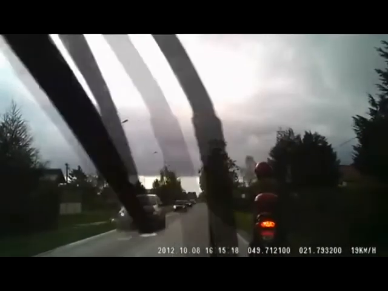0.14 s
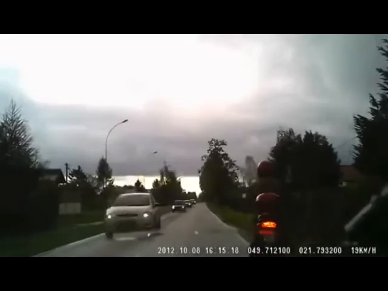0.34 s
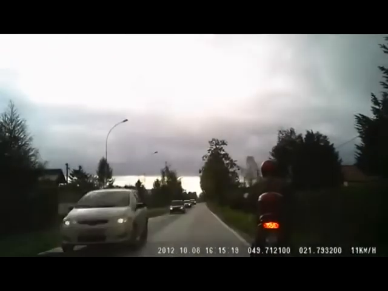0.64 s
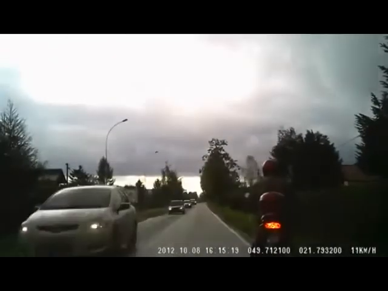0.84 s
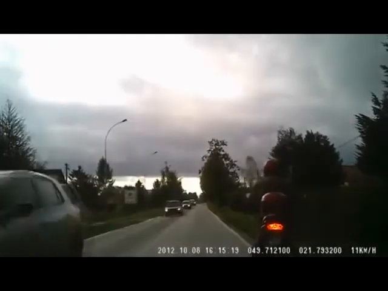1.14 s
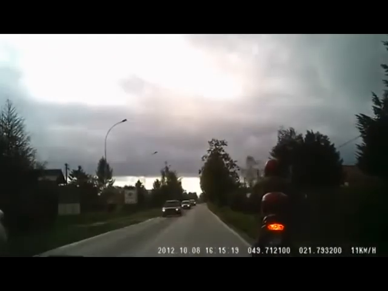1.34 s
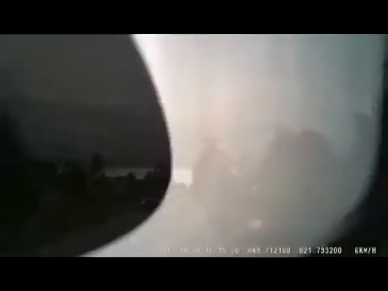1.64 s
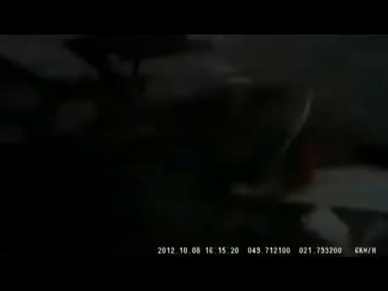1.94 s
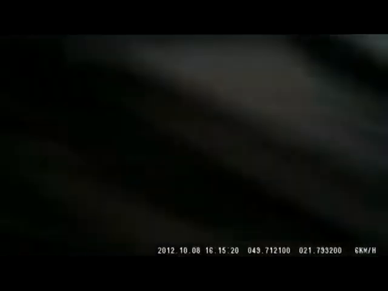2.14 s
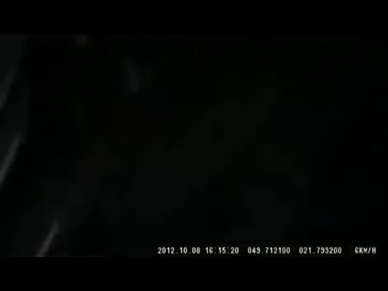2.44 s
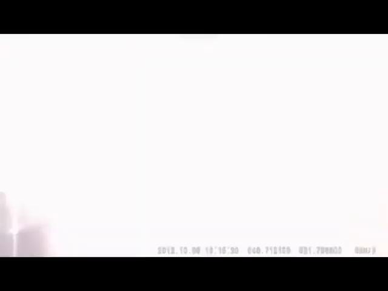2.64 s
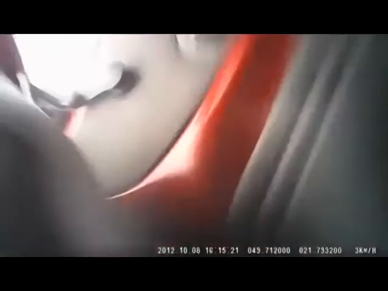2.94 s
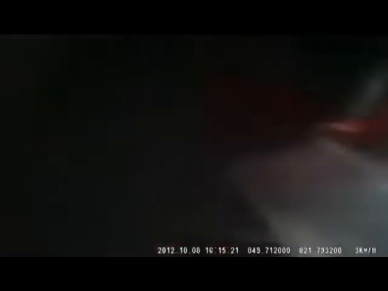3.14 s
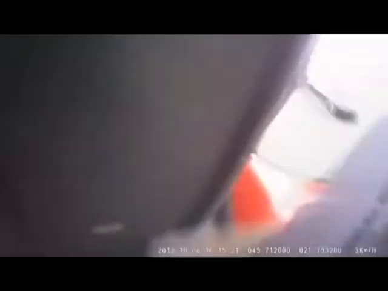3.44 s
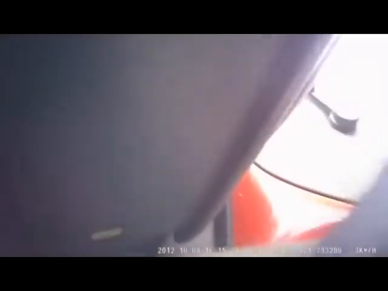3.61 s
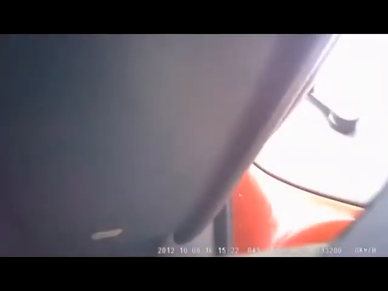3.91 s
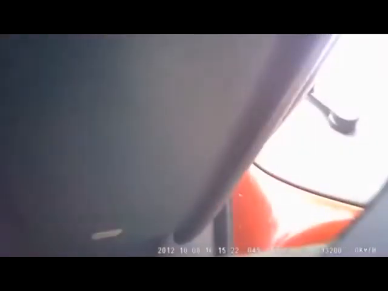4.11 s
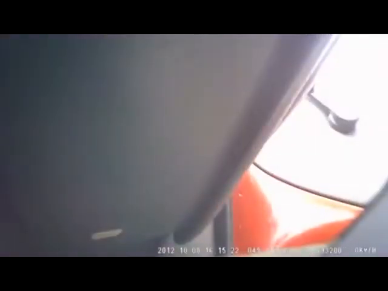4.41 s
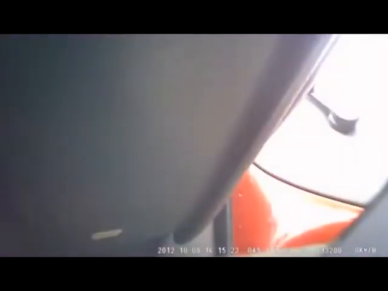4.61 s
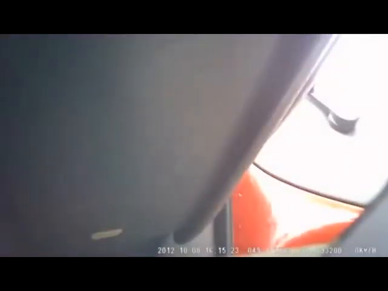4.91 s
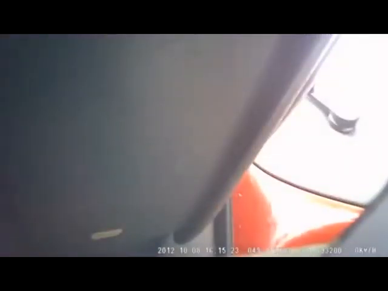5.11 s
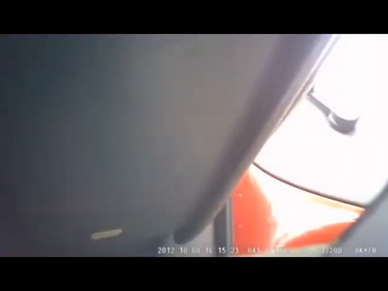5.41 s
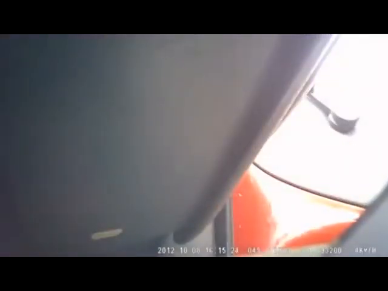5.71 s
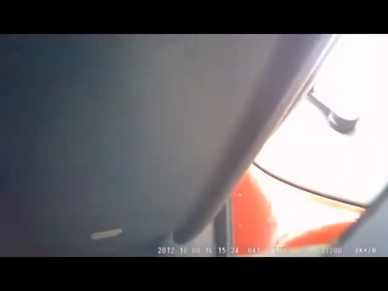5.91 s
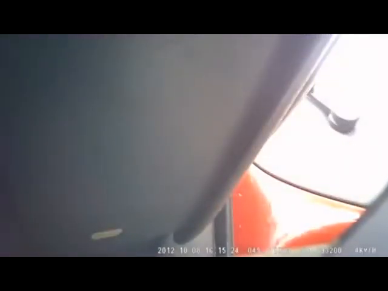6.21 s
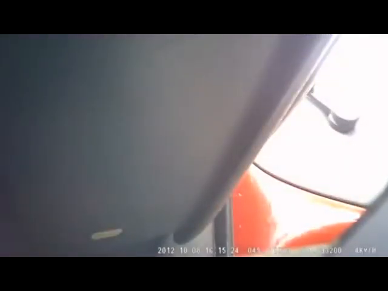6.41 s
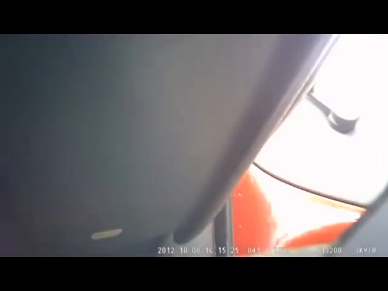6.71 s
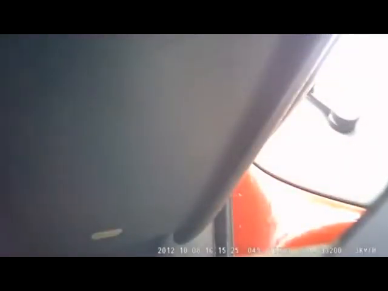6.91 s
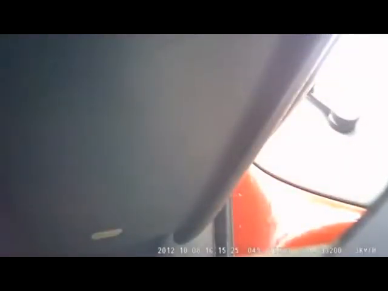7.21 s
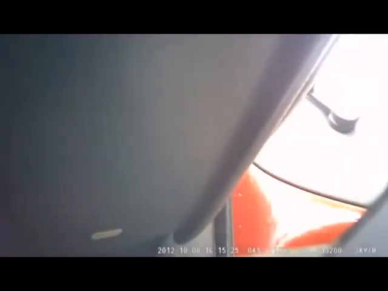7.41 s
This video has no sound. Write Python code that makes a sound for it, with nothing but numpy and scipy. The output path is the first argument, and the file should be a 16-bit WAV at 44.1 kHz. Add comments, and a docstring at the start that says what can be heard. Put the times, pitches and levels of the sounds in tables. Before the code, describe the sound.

The sound is heard inside a car through a small microphone with dull treble. Tyres rumble and hiss faintly on a wet road. The wipers drag and thump at about 0.4 seconds, and spray slaps the car at 1.1 seconds, then drains away. At 1.8 seconds a very loud collision begins: panels crumple, plastic splinters and the body jolts deeply, while rapid, irregular knocks and cracks distort the microphone as it is thrown about. A short rising plastic squeak comes near 2.9 seconds. The crunching and clattering end at about 4 seconds, followed by a brief, light rattle of bent trim. From there until the end at about 7.5 seconds, the engine idles with a quiet, throbbing hum under a faint, wavering wiper motor whine. The blades thump softly about every half second, alternately stronger and weaker, and a small dry scuff comes at 5.3 seconds.

```python
"""A car crash on a wet road, heard by a small camera in the cabin. The car rolls slowly, wipers on, and an
oncoming car throws spray at it. Then it is struck: bodywork crumples and the camera is thrown about,
its knocks overloading the microphone. Afterwards bent trim settles, the engine idles on and the
wipers keep turning."""
import sys
import numpy as np
from scipy import signal
from scipy.fft import rfft, irfft, next_fast_len
from scipy.io import wavfile
from scipy.ndimage import uniform_filter1d

SR = 44100
rng = np.random.default_rng(int(sys.argv[2]) if len(sys.argv) > 2 else 0)


def persist_wave(psi):
    """Save psi, clipped to +-1, as 16-bit WAV."""
    counts = np.round(np.clip(psi, -1, 1) * 32767).astype(np.int16)
    wavfile.write(sys.argv[1], SR, np.atleast_2d(counts).T)


N = 332955
T = np.arange(N) / SR


def undb(db):
    """Decibels to gain."""
    return 10 ** (np.asarray(db) / 20)


def unit(x):
    """Scale to rms 1."""
    return x / np.sqrt(np.mean(x ** 2))


def colour(x, spectrum):
    """Minimum-phase filter through (freq_hz, gain_db) points."""
    hz, db = np.transpose(spectrum)
    size = 2 * next_fast_len(N // 2 + 8192)
    bins_hz = np.maximum(np.arange(size // 2 + 1) * SR / size, 1)
    gain = undb(np.interp(np.log(bins_hz), np.log(hz), db))
    cepstrum = irfft(np.log(gain))
    cepstrum[1:size // 2] *= 2
    cepstrum[size // 2 + 1:] = 0
    return irfft(rfft(x, size) * np.exp(rfft(cepstrum)))[:N]


def noise(spectrum):
    """Coloured noise, rms 1."""
    return unit(colour(rng.standard_normal(N), spectrum))


def walk(rate_hz):
    """Smooth random drift, rms 1."""
    steps = rng.standard_normal(N)
    return unit(np.interp(T * rate_hz, np.arange(N), steps))


def grains(spectrum, rate_hz, spread_db):
    """Dense coloured clicks of unequal size, levelled to rms 1."""
    clicks = (rng.random(N) < rate_hz / SR) * rng.standard_normal(N)
    sizes = undb(spread_db * np.minimum(rng.exponential(size=N), 4))
    sound = colour(clicks * sizes, spectrum)
    return sound / np.sqrt(uniform_filter1d(sound ** 2, size=2048) + 1e-12)


def swell(start_s, attack_s, decay_s, hold_s=0):
    """Envelope: linear rise to 1, hold, exponential decay."""
    age_s = T - start_s
    return np.clip(age_s / attack_s, 0, 1) * np.exp(-np.maximum(age_s - attack_s - hold_s, 0) / decay_s)


def since(start_s):
    """The next half second: slice and elapsed time."""
    first = int(start_s * SR)
    span = slice(first, min(first + SR // 2, N))
    return span, T[span] - T[first]


def ring(t, modes):
    """Decaying modes, detuned afresh at each strike."""
    sound = 0
    for hz, db, t60_s in modes:
        detuned_hz = hz * (1 + .024 * rng.standard_normal())
        sound += undb(db) * np.sin(2 * np.pi * detuned_hz * t) * undb(-60 * t / t60_s)
    return sound


# tyre spectra: freq_hz, gain_db
TYRE_ROAR = [(12, -24.5), (20, 8), (109, -7.5), (209, -2), (312, -4.5), (341, -7), (517, -4.5),
             (797, -16.5), (888, -17), (1500, -50), (1950, -58), (3300, -120)]
TYRE_HISS = [(500, -8), (1000, 2), (1700, -3), (2500, -8), (3400, -16), (5000, -16)]

def tyres(roar_db=-48, hiss_db=-55):
    """Tyres roar and hiss on the wet road."""
    roar = undb(roar_db + walk(2.8)) * noise(TYRE_ROAR)
    hiss = undb(hiss_db + walk(4)) * noise(TYRE_HISS)
    return roar + hiss


# blade reversals: start_s, thump_db, tick_db
REVERSALS = [(0.368, -24.5, -19.5), (4.542, -25, -38), (4.98, -37.5, -54), (5.489, -30.5, -40.5),
             (5.925, -39, -36.5), (6.44, -26, -40), (6.889, -40.5, -45), (7.388, -30.5, -40.5)]
# blades brushing wet glass: start_s, level_db
SWISHES = [(.74, -53.5), (5.93, -73), (6.89, -76)]
# thump modes: pitch_hz, gain_db, t60_s
THUMP_MODES = [(139.8, -3, 0.2), (174.7, 16, 0.0567), (234, -25, 0.1464), (392, -10, 0.2), (620, -19, 0.12)]
# blade tick, dragging rubber and water spectra: freq_hz, gain_db
TICK = [(130, -29), (250, 9.5), (650, -1.5), (1000, -15), (2100, -17.5), (4000, -36)]
RUBBER = [(100, -7), (170, 3), (300, 8), (450, 1), (700, 0), (1100, -33), (2500, -37)]
DROPS = [(600, -35), (1100, -0.5), (1700, 2.5), (2300, 3), (3200, -5.5), (5000, -12)]

def wipers(flip_s=.015, tick_rise_s=.0011, tick_decay_s=.01, lag_s=.028, second_db=-13):
    """Rubber drags over glass; at each reversal one blade flips and thumps, then the other."""
    thumps, ticks = np.zeros(N), np.zeros(N)
    drag = undb(-37) * swell(0, attack_s=.046, decay_s=.069, hold_s=.13)
    for start_s, thump_db, tick_db in REVERSALS:
        drag += undb(thump_db - 18) * np.exp(-np.abs(T - start_s) / .026)  # slow rubber grips harder
        for delay_s, blade_db in ((0, 0), (lag_s, second_db)):
            span, t = since(start_s + delay_s)
            thumps[span] += undb(thump_db + blade_db) * ring(t, THUMP_MODES) * (1 - np.exp(-t / flip_s))
            tick = (1 - np.exp(-t / tick_rise_s)) * np.exp(-t / tick_decay_s)
            ticks[span] += undb(tick_db + blade_db) * tick
    rubber = noise(RUBBER) * drag * undb(2.3 * walk(41))
    swish = sum(undb(db) * swell(start_s, attack_s=.044, decay_s=.06) for start_s, db in SWISHES)
    return thumps + ticks * noise(TICK) + rubber + noise(DROPS) * swish


# sheets of spray: start_s, drum_db, hiss_db
SLAPS = [(1.084, -23.5, -34.5), (1.124, -31, -32)]
# drumming spectrum: freq_hz, gain_db
DRUMMING = [(20, -16.5), (35, 3.5), (65, 2.5), (110, -8), (150, 5), (205, 3), (290, -7), (480, -5),
            (720, -15), (1200, -17.5), (2500, -58)]

def spray():
    """Spray slaps the car and drains off; a low rumble swells just before the collision."""
    drain = swell(SLAPS[-1][0], attack_s=.015, decay_s=.92)
    rumble = undb(-38) * swell(1.72, attack_s=.064, decay_s=.2)
    drum = undb(-45) * drain + rumble
    hiss = undb(-48) * drain
    for start_s, drum_db, hiss_db in SLAPS:
        slap = swell(start_s, attack_s=.015, decay_s=.048)
        drum += undb(drum_db) * slap
        hiss += undb(hiss_db) * slap
    return noise(DRUMMING) * drum + grains(DROPS, rate_hz=4300, spread_db=-2.5) * hiss


# blows on trim and camera housing, levels relative: start_s, pitch_hz, knock_db, crack_db, length_s
BLOWS = [(1.8395, 199.7, -4, -19.5, 0.015), (1.857, 544, -6, -10.5, 0.009), (1.901, 199.8, -5, -7.5, .03),
         (1.948, 400, -18, -10, 0.016), (1.999, 574, -17.5, -8.5, 0.025), (2.033, 360, -9.5, -7.5, 0.03),
         (2.069, 613, -14.5, -8.5, 0.025), (2.103, 494, 2.5, -9.5, 0.016), (2.137, 227, 2, -17, 0.019),
         (2.168, 597, -29, -17, 0.018), (2.21, 550, -32, -15.5, 0.044), (2.256, 452, -19.5, -17, 0.03),
         (2.2981, 400, -6, -6, 0.022), (2.326, 229.6, -1.5, -6, 0.023), (2.346, 516, -17.5, -14, 0.026),
         (2.384, 412, -3, -4, 0.02), (2.431, 536, -23, -13, .012), (2.437, 535, -19.5, -4.5, 0.018),
         (2.456, 268, -11, -5.5, .03), (2.481, 542, -14, -11, 0.02), (2.502, 604, -13, -18, .008),
         (2.528, 409, -8.5, -5, 0.021), (2.578, 606, -27.5, -16.5, 0.014), (2.613, 820, -29, -16.5, 0.011),
         (2.634, 415, -8, -6, 0.033), (2.7084, 435, -10, -4.5, 0.018), (2.756, 434, -5.5, -4.5, 0.01),
         (2.7767, 263, -11, -10, 0.0043), (2.844, 212, -1.5, -4, .02), (2.877, 398, -19.5, -5, .016),
         (2.897, 500, -20.5, -8.5, .02), (2.9203, 707, -16, -7.5, 0.014), (2.99, 844, -26.5, -7, 0.014),
         (3.007, 493, -20, -10.5, .008), (3.034, 386, -17.5, -8, 0.038), (3.052, 519, -4, -8, 0.032),
         (3.08, 550, -17.5, -11, 0.022), (3.126, 505, -13.5, -6.5, 0.018), (3.138, 607, -21, -7.5, 0.021),
         (3.154, 404, -15, -9.5, 0.013), (3.217, 680, -21.5, -5.5, 0.013), (3.244, 418.6, -4.5, -16, 0.024),
         (3.265, 586, -3, -15.5, .018), (3.278, 559, -8.5, -5, 0.021), (3.31, 275, -24, -19.5, 0.022),
         (3.3683, 426, -12, -1.5, 0.02), (3.412, 447, -19.5, -12.5, 0.026), (3.474, 742, -10, -11, .028),
         (3.495, 388, -14, -5.5, 0.03), (3.534, 232, -21.5, -7.5, 0.034), (3.58, 680, -15.5, -7, 0.014),
         (3.609, 676, -16, -6, 0.011), (3.633, 846, -17.5, -8.5, 0.035), (3.659, 616, -15, -11, 0.024),
         (3.708, 600, -17.5, 1, 0.0027), (3.742, 594, -14, -2, 0.0059), (3.76, 684, -18.5, -15, 0.025),
         (3.782, 467, -19, -9.5, 0.011), (3.883, 613, -33.5, -28.5, 0.076), (3.917, 543, -9, -0.5, 0.0081),
         (3.955, 457, -48, -35.5, 0.041), (3.982, 540, -43, -25, 0.037), (4.0193, 555, -33, -22.5, 0.028)]
# buckling panel and splintering plastic spectra: freq_hz, gain_db
PANELS = [(100, -22), (190, -3), (350, -3.5), (560, 0), (800, -7), (1200, -11), (2500, -37)]
PLASTIC = [(400, -14), (800, 3.5), (1200, 0.5), (2000, 0), (3200, -4.5), (4200, -8), (6000, -10.5)]

def blows(knock_gain_db=6, crack_gain_db=4, sag=.2, roughness=.33, crack_rise_s=.0024):
    """Each contact cracks; the housing swings a few cycles, sinking in pitch as the contact lets go."""
    tones, swings, cracks = np.zeros(N), np.zeros(N), np.zeros(N)
    slip_cycles = .15 * walk(350)  # sliding contacts make the cycles uneven
    for start_s, pitch_hz, knock_db, crack_db, length_s in BLOWS:
        span, t = since(start_s)
        peak_s = .23 * length_s + .0014
        age = t / peak_s
        swing = undb(knock_db) * (age * np.exp(1 - age)) ** 2
        cycles = np.cumsum(pitch_hz * (1 + sag * (np.exp(-age / 2) - .5))) / SR
        tones[span] += swing * np.sin(2 * np.pi * (cycles + slip_cycles[span] + rng.random()))
        swings[span] += swing
        closing = 1 - np.exp(-t / crack_rise_s)
        cracks[span] += undb(crack_db) * closing * np.exp(-(t / (.34 * length_s)) ** 2)
    knocks = undb(knock_gain_db) * (tones + roughness * swings * noise(PANELS))
    return knocks + undb(crack_gain_db + 2.5 * walk(330)) * cracks * noise(PLASTIC)


# crushing force on the bodywork: time_s, level_db
CRUSH = [(1.83, -45), (1.85, -15), (1.92, -8.5), (2.02, -19.5), (2.11, -12), (2.18, -22.5), (2.48, -20.5),
         (2.64, -22.5), (2.69, -32), (2.8, -25), (3.0, -20.5), (3.05, -6.5), (3.11, -27.5), (3.35, -26.5),
         (3.45, -20.5), (3.54, -11.5), (3.78, -35.5), (4.02, -39.5)]
# whole-body jolts: start_s, level_db
JOLTS = [(1.832, -13), (1.96, -13.5), (2.36, -24.5), (2.47, -22), (2.55, -28), (2.835, -20), (2.925, -11.5),
         (3.23, -20), (3.32, -28), (3.5, -24)]
# heaving body spectrum: freq_hz, gain_db
BODY = [(15, -8.5), (28, 0), (55, 4.5), (85, -3.5), (150, -5), (300, -32.5)]

def crumple(panel_db=-1, shudder_db=-21, rattle_db=-18, rattle_s=.014, fall_db_per_s=350):
    """One force buckles panels in coarse jerks, splinters plastic finely and shakes the body."""
    times_s, force_db = np.transpose(CRUSH)
    outside_s = np.abs(T - np.clip(T, times_s[0], times_s[-1]))
    power = undb(np.interp(T, times_s, force_db) - fall_db_per_s * outside_s) ** 2
    for start_s, _, _, crack_db, _ in BLOWS:  # loose parts rattle on
        span, t = since(start_s)
        power[span] += (undb(crack_db + rattle_db) * np.exp(-t / rattle_s)) ** 2
    force = np.sqrt(power)
    cave_in = undb(-1.5) * swell(1.84, attack_s=.017, decay_s=.035)
    heave = sum(undb(db) * swell(start_s, attack_s=.017, decay_s=.06) for start_s, db in JOLTS)
    panels = grains(PANELS, rate_hz=700, spread_db=2.5) * (undb(panel_db) * force + cave_in)
    splinters = grains(PLASTIC, rate_hz=5000, spread_db=1.5) * undb(2.2 * walk(170)) * force
    return panels + splinters + noise(BODY) * (heave + undb(shudder_db) * force)


def squeak(start_s=2.943, pitch_hz=1440, rise_hz_per_s=17500, level_db=-13):
    """Plastic on plastic: stick-slip that speeds up as the contact slides."""
    sliding_s = np.clip(T - start_s, 0, .06)
    hz = (pitch_hz + rise_hz_per_s * sliding_s) * (1 + .025 * walk(900))
    grip = undb(level_db) * swell(start_s, attack_s=.0022, decay_s=.01, hold_s=.022)
    return np.sqrt(2) * grip * np.sin(2 * np.pi * np.cumsum(hz) / SR)


# engine partials: firing_multiple, level_db
IDLE = [(1, -44.5), (2, -48), (3, -61), (5, -67), (8, -63)]
# cabin hum spectrum: freq_hz, gain_db
CABIN = [(20, -19.5), (41, -12.5), (70, 0), (87, -20.5), (133, -6.5), (168, -10.5), (220, -11),
         (287, -17.5), (362, -14), (527, -17), (727, -21), (1020, -26.5), (1540, -30), (1680, -26),
         (1980, -28.5), (2250, -34), (3100, -36.5), (3600, -41), (5000, -43.5), (6500, -81), (11000, -120)]

def idle(firing_hz=27.6, cabin_db=-49):
    """The engine idles; the cabin hum throbs at the firing rate."""
    phase = 2 * np.pi * np.cumsum(firing_hz * (1 + .008 * walk(3.7))) / SR
    engine = sum(undb(db + 1.2 * walk(8)) * np.sin(multiple * phase) for multiple, db in IDLE)
    cabin = noise(CABIN) * undb(cabin_db + .56 * walk(32) + 1.23 * np.cos(phase))
    return np.sqrt(2) * engine + cabin


# motor partials: pitch_hz, level_db
MOTOR = [(361, -62), (750, -67)]

def wiper_motor():
    """The motor whines, wavering under changing load."""
    whine = np.zeros(N)
    for pitch_hz, level_db in MOTOR:
        gain = undb(level_db + 3 * walk(18))
        hz = pitch_hz * (1 + .0217 * walk(30))
        whine += gain * np.sin(2 * np.pi * np.cumsum(hz) / SR)
    return np.sqrt(2) * whine


# trim creaks: start_s, rattle_db, ring_db
CREAKS = [(4.117, -48, -48), (4.145, -64, -55), (4.172, -68, -47), (4.194, -60, -42.5), (4.213, -64, -45)]
# thin trim and scuff spectra: freq_hz, gain_db
TRIM = [(900, -6), (1350, -18), (1470, 8), (1640, -21), (1900, -13), (2150, -31), (2260, 5), (2450, -23),
        (2850, -14), (3020, -11), (3250, -28), (4500, -29)]
SCUFF = [(1200, -10), (1800, -7), (2350, -2), (2700, -4), (3100, -4), (4200, -8), (6000, -9)]

def settling():
    """Bent trim rattles and rings as it comes to rest; later a loose piece slips with a dry scuff."""
    rattle, ringing = np.zeros(N), np.zeros(N)
    for start_s, rattle_db, ring_db in CREAKS:
        creak = swell(start_s, attack_s=.008, decay_s=.017)
        rattle += undb(rattle_db) * creak
        ringing += undb(ring_db) * creak
    scuff = undb(-41) * swell(5.283, attack_s=.007, decay_s=.012)
    trim = noise(PLASTIC) * rattle + grains(TRIM, rate_hz=490, spread_db=-3) * ringing
    return trim + noise(SCUFF) * scuff


def scene():
    """Road sound ends at the impact; idle and wiper motor fade in from 3 s."""
    rolling = np.clip((1.9 - T) / .074, 0, 1)
    stopped = np.clip((T - 3) / .67, 0, 1)
    driving = rolling * (tyres() + spray()) + wipers()
    crash = blows() + crumple() + squeak()
    aftermath = settling() + stopped * (idle() + wiper_motor())
    return (driving + crash + aftermath)[None]


# microphone response before and after clipping: freq_hz, gain_db
PRE_CLIP = [(3500, 1.5), (4200, -3), (4700, -6.5), (5200, -28), (6500, -33.5), (8000, -24), (12000, -38.5)]
POST_CLIP = [(8, -20), (25, -0.5), (1000, -0.5), (3800, -0.5), (5000, -11.5), (7500, -9.5), (10000, -11),
             (15000, -9.5)]

def record(dry, bend_share=.16, bend_level=.14, ceiling=.405, hardness=16, top_hz=15200):
    """A narrow-band microphone stage bends a little, then clips; its distortion fills the high treble."""
    narrow = colour(dry[0], PRE_CLIP)
    bent = (1 - bend_share) * narrow + bend_share * bend_level * np.tanh(narrow / bend_level)
    clipped = bent / (1 + (np.abs(bent) / ceiling) ** hardness) ** (1 / hardness)
    lowpass = signal.ellip(8, .2, 70, top_hz, fs=SR, output="sos")
    return signal.sosfilt(lowpass, colour(clipped, POST_CLIP))[None]


dry = scene()
out = record(dry)
persist_wave(out)
```